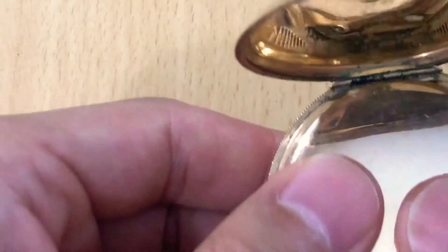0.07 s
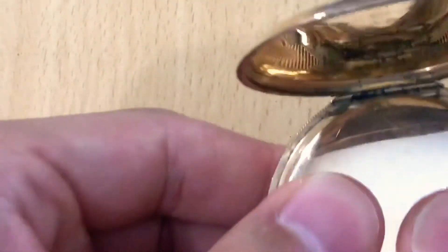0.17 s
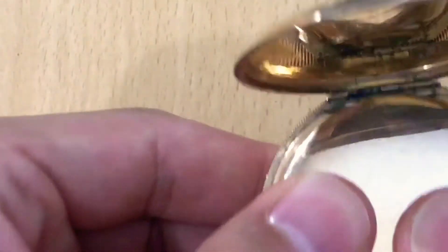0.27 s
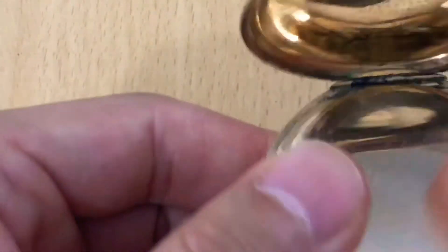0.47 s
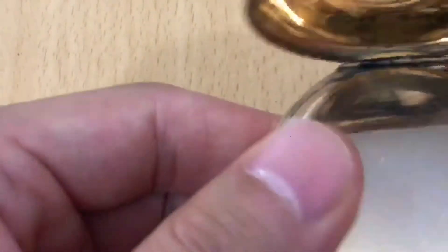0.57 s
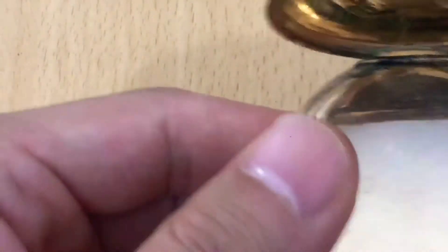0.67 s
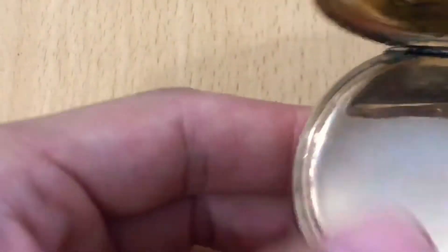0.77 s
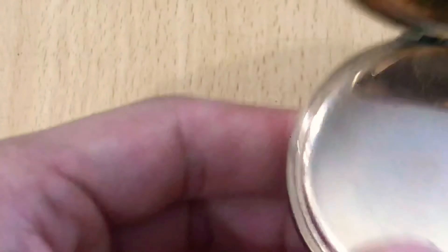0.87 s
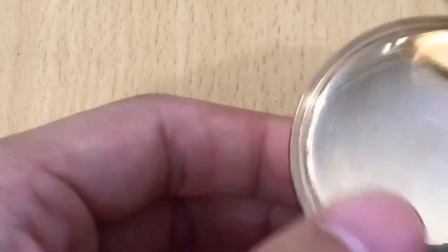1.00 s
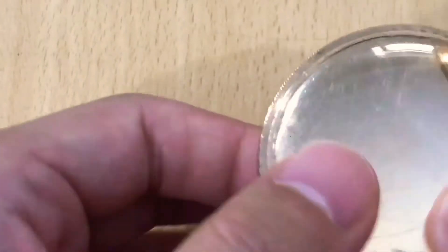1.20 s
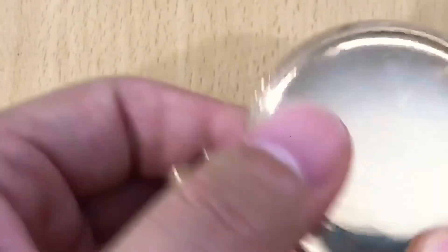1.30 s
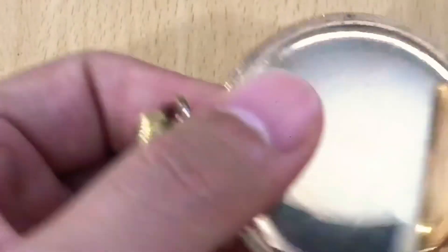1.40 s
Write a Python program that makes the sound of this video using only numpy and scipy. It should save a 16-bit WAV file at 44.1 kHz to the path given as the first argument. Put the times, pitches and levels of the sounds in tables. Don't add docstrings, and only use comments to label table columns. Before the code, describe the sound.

Very close, one sharp metallic click of a watch lid, preceded by tiny catch slips and followed by a short room tail, slight hiss, quiet rapid ticks and a few dull nail taps on the case.

```python
import sys
import numpy as np
from scipy import signal
from scipy.io import wavfile
from scipy.ndimage import uniform_filter1d

SR = 44100
rng = np.random.default_rng(int(sys.argv[2]) if len(sys.argv) > 2 else 0)


def invert_db(x):
    u = np.asarray(x, float) / 20
    return 10 ** u


def materialize(psi):
    bounded = np.clip(np.atleast_2d(psi).T, -1, 1)
    quanta = np.round(bounded * 32767).astype(np.int16)
    wavfile.write(sys.argv[1], SR, quanta)


N = 63945
HIT = 6000
EDGE_HZ = 15900

CONTACT_S = [
    .2062,
    .2083,
    .2178,
    .2203,
    .2294,
    .2299,
    .2312,
    .2318,
    .2338,
    .2357,
]
MAIN_STRIKE = 4


def evened(x):
    return x / np.sqrt(np.mean(x ** 2) + 1e-20)


def read(points, hz):
    point_hz, value = np.transpose(points)
    return np.interp(np.log(hz + 1), np.log(point_hz + 1), value)


def add(mix, start_s, sound):
    part = mix[round(start_s * SR):][:len(sound)]
    part += sound[:len(part)]


def ring(modes, tilt_db=0.):
    hz, db, t60 = np.transpose(modes)[:, :, None]
    t = np.arange(HIT) / SR
    level_db = db + tilt_db * np.log2(hz / 3000) - 60 * t / t60
    return (invert_db(level_db) * np.sin(2 * np.pi * hz * t)).sum(0)


def hiss(spectrum, patchy_db):
    frames, hz = N // 256 + 5, np.fft.rfftfreq(1024, 1 / SR)
    real, imaginary, patches = rng.standard_normal((frames, 513, 3)).T
    patches = uniform_filter1d(patches, size=8, axis=0)
    patches = evened(uniform_filter1d(patches, size=8, axis=1))
    level_db = read(spectrum, hz)[:, None] + patchy_db * patches
    z = (real + 1j * imaginary) * invert_db(level_db) * (hz < EDGE_HZ)[:, None]
    return evened(signal.istft(z, nperseg=1024, noverlap=768)[1][:N])


def fuzzy(lines):
    turn = np.arange(N) * 2j * np.pi / SR
    out = np.zeros(N)
    for (hz, width_hz, db), noise in zip(lines, rng.standard_normal((len(lines), 2, N))):
        pole = np.exp(-np.pi * width_hz / SR)
        slow = signal.lfilter([1], [1, -pole], noise[0] + 1j * noise[1])
        out += invert_db(db) * evened((np.exp(turn * hz) * slow).real)
    return out


def room_air():
    # pitch_hz, level_db (per Hz)
    air_colour = [(240, -30.5), (400, -3), (446, -9.5), (588, -6.5), (893, -8.5), (1070, -6), (1840, -15),
                  (2550, -15), (16000, -26.5)]
    rumble_colour = [(18, -36), (30, -6), (43, -6.5), (92, -0.5), (166, -11.5), (200, -7), (265, -4.5),
                     (299, -13), (400, -11.5), (520, -47.5), (880, -120)]
    # pitch_hz, width_hz, level_db
    hum_lines = [(57, 6, -74.5), (106, 8, -72.5), (204, 13, -76.5), (259, 24, -76), (327, 10, -78)]
    air = invert_db(-68.5) * hiss(air_colour, patchy_db=-0.6)
    rumble = invert_db(-64.5) * hiss(rumble_colour, patchy_db=0.5)
    return air + rumble + fuzzy(hum_lines)


def movement():
    beat_db = [-65, -68, -64, -63, -65, -63, -67]
    # delay_s, level_db
    steps = [
        (0, -2),
        (.0025, 0),
        (.013, -6),
    ]
    # pitch_hz, level_db, t60_s
    modes = [(4796, -1.5, 0.03), (4800, -8, 0.043), (8400, -7, .01), (9000, -9, 0.019), (9537, -13, .012)]
    first_s, every_s, jitter_s = .0602, .2005, .0004
    scratch_db, scratch_t60 = 2.5, .02
    scratch_band = signal.butter(1, (5500, 11500), "band", fs=SR)
    out, t = np.zeros(N), np.arange(HIT) / SR
    luck = rng.standard_normal((len(beat_db), len(steps)))
    for beat, db in enumerate(beat_db):
        for (delay_s, step_db), chance in zip(steps, luck[beat]):
            scratch = signal.lfilter(*scratch_band, rng.standard_normal(HIT))
            scratch = scratch * invert_db(scratch_db - 60 * t / scratch_t60)
            start_s = first_s + beat * every_s + delay_s + jitter_s * chance
            add(out, start_s, invert_db(db + step_db) * (ring(modes, chance) + scratch))
    return out


def cover():
    # level_db, tilt_db_per_octave (positive is brighter), ring_share_db
    strikes = [(-31.5, -0.5, -18.5), (-52.5, -2, -12), (-49.5, -2.5, -13), (-60, -3.5, -10.5),
               (-4, 3.5, 0.5), (0, 4.5, -16.5), (-4.5, -2.5, 9.5), (-3.5, -9.5, -11), (-15.5, 4.5, -7),
               (-40.5, -6, -8)]
    # pitch_hz, level_db, t60_s
    rim_modes = [(820, -25.5, 0.023), (1050, -13, 0.0042), (1384, -13.5, .009), (2400, -17.5, 0.0019),
                 (3520, -4, 0.0055), (5210, -1.5, 0.003), (6930, -9, 0.0062), (9040, -22.5, 0.0043),
                 (12260, -15, 0.0013), (15200, -31.5, .003)]
    cover_modes = [(293, -24.5, 0.017), (670, -48, .06), (1245, -27.5, 0.048), (2895, -11.5, .024),
                   (3830, -14.5, 0.0093), (4190, -10, 0.02), (5100, -17.5, .02), (5956, -10.5, 0.0061),
                   (7235, -32.5, .02), (9300, -22.5, 0.0083), (10220, -27.5, .05), (12330, -42, 0.0065),
                   (14240, -35, .018)]
    crack_db, crack_t60 = -19, .007
    soften = signal.butter(1, 7000, fs=SR)
    clack, bell, puff = np.zeros(N), np.zeros(N), np.zeros(N)
    t = np.arange(HIT) / SR
    for start_s, (db, tilt_db, ring_db) in zip(CONTACT_S, strikes):
        crack = signal.lfilter(*soften, rng.standard_normal(HIT))
        crack = crack * invert_db(crack_db + 2 * tilt_db - 60 * t / crack_t60)
        add(clack, start_s, invert_db(db) / 2 * (ring(rim_modes, tilt_db) + crack))
        add(bell, start_s, invert_db(db + ring_db) / 2 * ring(cover_modes, tilt_db))
    add(puff, CONTACT_S[MAIN_STRIKE], invert_db([13.5]))
    return clack, bell, puff


def scrape():
    # pitch_hz, width_hz, level_db
    scrape_lines = [(3100, 300, -6), (5300, 300, -2), (7500, 250, -1)]
    from_s, to_s, fade_s = .2145, .231, .0022
    t = np.arange(N) / SR
    drag = np.clip(np.minimum(t - from_s, to_s - t) / fade_s, 0, 1)
    return invert_db(-61.5) * drag * fuzzy(scrape_lines)


def thump():
    out = np.zeros(N)
    body = [(90, -45.5, .06), (160, -40, .06), (270, -32, .05)]  # pitch_hz, level_db, t60_s
    add(out, CONTACT_S[MAIN_STRIKE], ring(body))
    return out


def room(x):
    # pitch_hz, t60_s
    decay = [(150, 0.1), (500, .22), (1200, .22), (2800, 0.25), (6000, 0.21), (12000, 0.12)]
    # pitch_hz, level_db
    colour = [(200, -24), (500, -3), (1100, 2), (2000, -7), (3000, -3), (6500, -9), (9000, -15),
              (15000, -20.5)]
    early_s, rise_s, early = .012, .03, invert_db(-1)
    reflections = np.zeros(SR // 2)
    at = np.arange(0, SR // 2 - 12, 12)
    reflections[at + rng.integers(0, 12, len(at))] = rng.choice([-1., 1.], len(at))
    hz, t, z = signal.stft(reflections, SR, nperseg=256)
    level_db = read(colour, hz)[:, None] - 60 * t / read(decay, hz)[:, None]
    tail = signal.istft(z * invert_db(level_db), SR, nperseg=256)[1]
    tail_s = np.arange(len(tail)) / SR
    tail = tail * np.interp(tail_s, [.001, .004, early_s, early_s + rise_s], [0, early, early, 1])
    return signal.fftconvolve(x, tail / np.linalg.norm(tail))[:N]


def coarse_hiss():
    # pitch_hz, level_db
    coarse_colour = [(300, -7.5), (800, 1.5), (2000, -1.5), (5000, -5), (9500, -9), (10400, -16.5),
                     (11500, -10), (16000, -7.5)]
    from_s, to_s, fade_s = .23, .637, .003
    t = np.arange(N) / SR
    coarse = np.clip(np.minimum(t - from_s, to_s - t) / fade_s, 0, 1)
    return invert_db(-61.5) * coarse * hiss(coarse_colour, patchy_db=1.5)


def fingernail():
    # start_s, level_db, ring_share_db, tilt_db_per_octave (positive is brighter)
    taps = [
        (0.59, -53, 5, -2.5),
        (0.6153, -56, -1, -2),
        (.698, -76, -16, 7),
        (1.0748, -63.5, -3, 2),
        (1.099, -68, 2.5, -5),
        (1.1976, -53.5, 5, 1),
        (1.275, -64, -18, -4.5),
        (1.349, -59, -3, -1),
    ]
    # pitch_hz, level_db, t60_s
    nail_modes = [(1423, -3, 0.034), (1770, 0.5, 0.018), (2070, 6, 0.015), (2310, -1.5, 0.012),
                  (4210, -5, 0.02), (6300, -10, 0.011)]
    back_modes = [(2698, 6, 0.028), (2770, -6, 0.015)]
    touch_s, back_lag_s = .0006, .0016
    out, t = np.zeros(N), np.arange(HIT) / SR
    back = (1 - np.exp(-(t / back_lag_s) ** 2)) * ring(back_modes)
    for start_s, db, ring_db, tilt_db in taps:
        nail = (1 - np.exp(-t / touch_s)) * ring(nail_modes, tilt_db)
        add(out, start_s, invert_db(db) * (nail + invert_db(ring_db) * back))
    return out


def scene():
    clack, bell, puff = cover()
    small = scrape() + movement() + fingernail()
    to_room = puff + invert_db(-6) * small + invert_db(-22.5) * (bell + clack)
    watch = clack + bell + small + invert_db(-11) * room(to_room)
    low_cut = signal.butter(3, 590, "high", fs=SR, output="sos")
    watch = signal.sosfilt(low_cut, watch)
    return (watch + thump() + room_air())[None]


def roll_off(x):
    return signal.sosfilt(signal.butter(12, 17130, fs=SR, output="sos"), x)


def record(dry):
    x = dry + coarse_hiss()
    band_edge = signal.firwin(63, EDGE_HZ + 300, window=("kaiser", 7), fs=SR)
    x = signal.oaconvolve(x, band_edge[None], "same")
    mix = x * min(1, .9 / abs(x).max())
    return roll_off(mix)


dry = scene()
out = record(dry)
materialize(out)
```